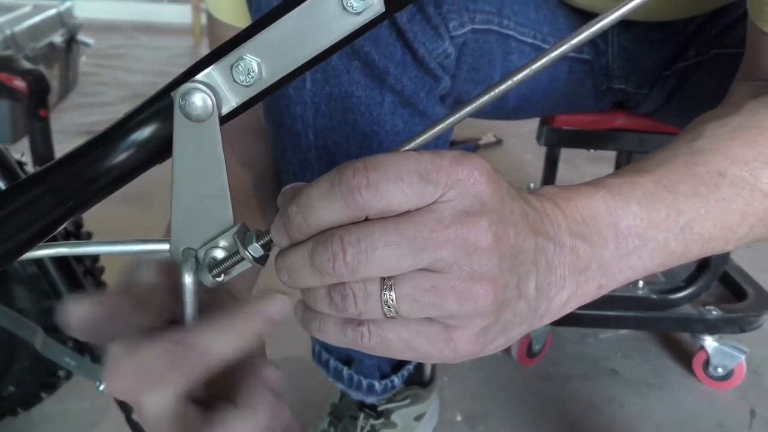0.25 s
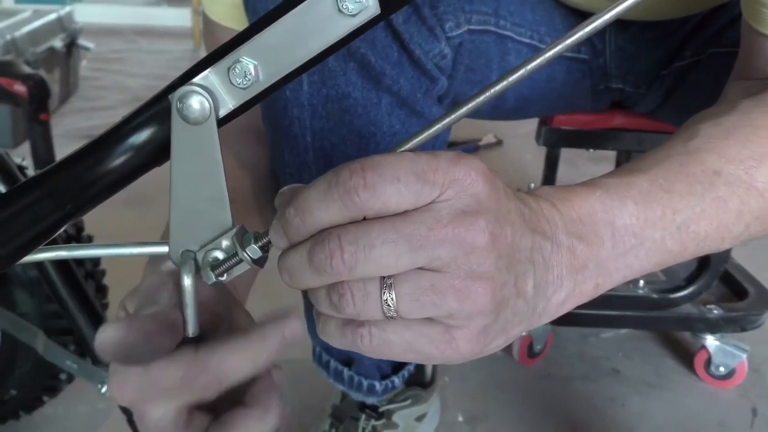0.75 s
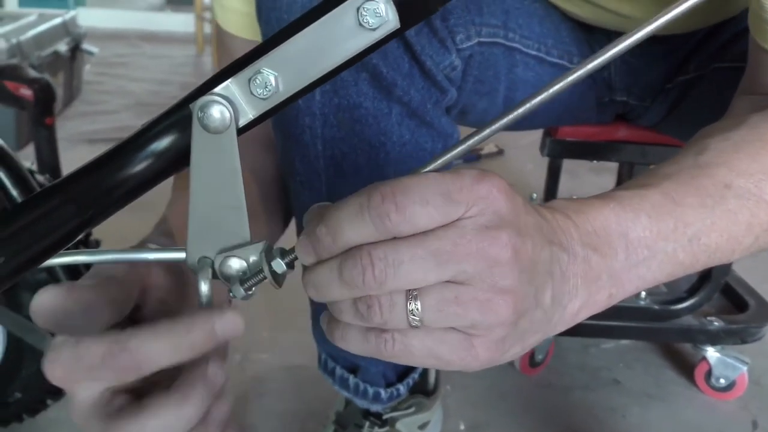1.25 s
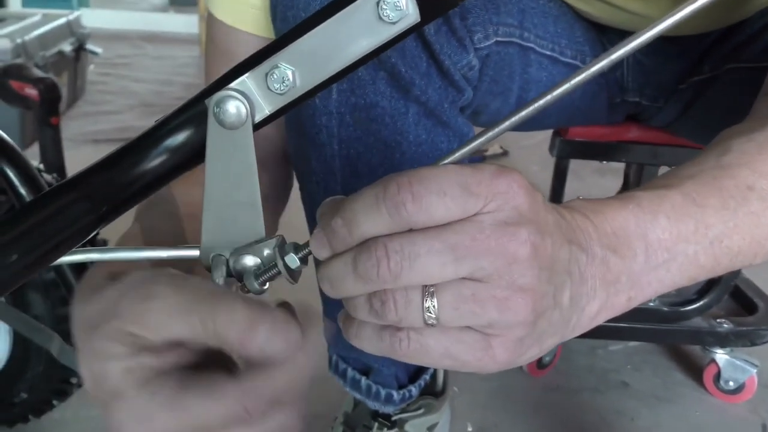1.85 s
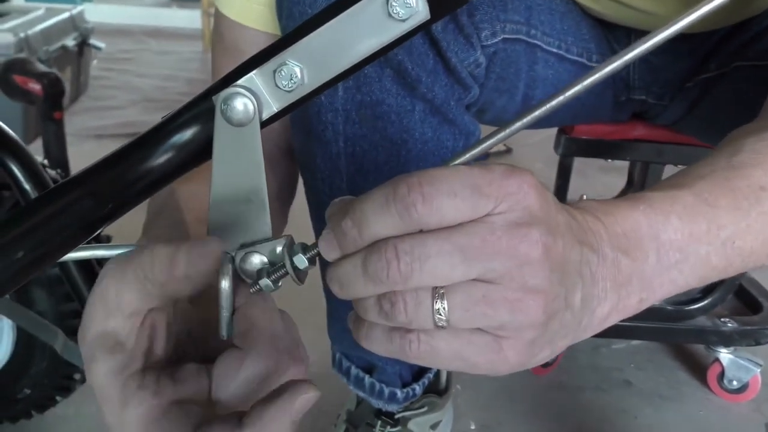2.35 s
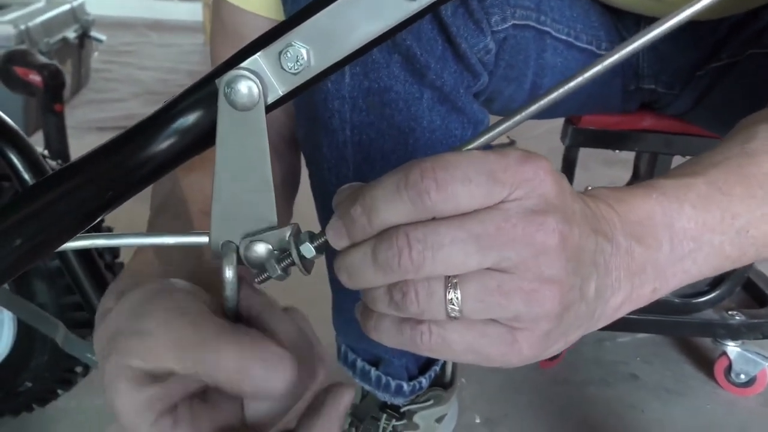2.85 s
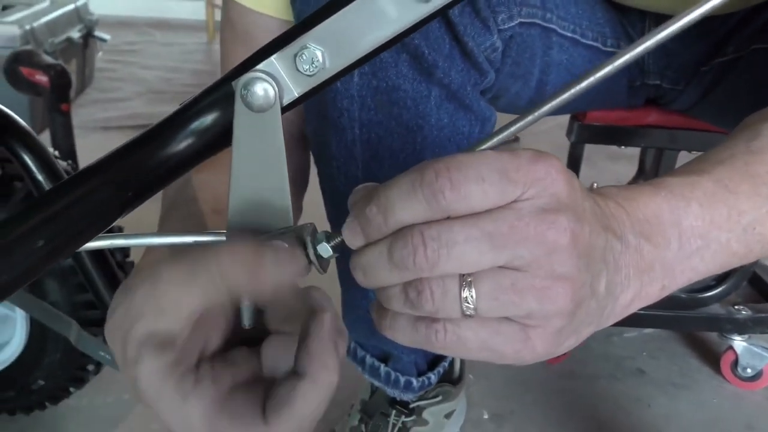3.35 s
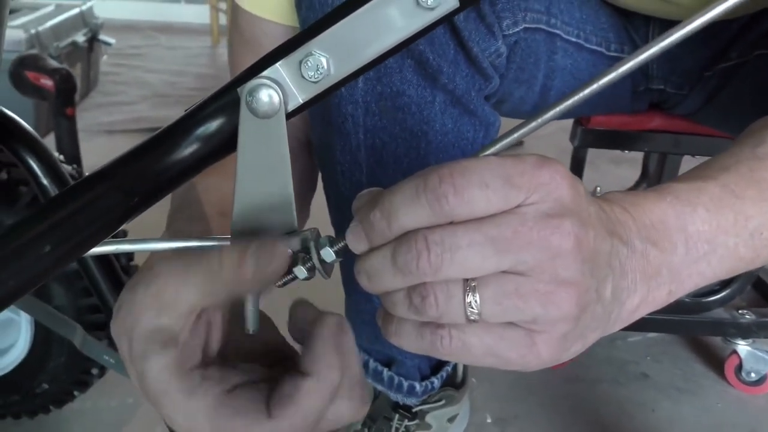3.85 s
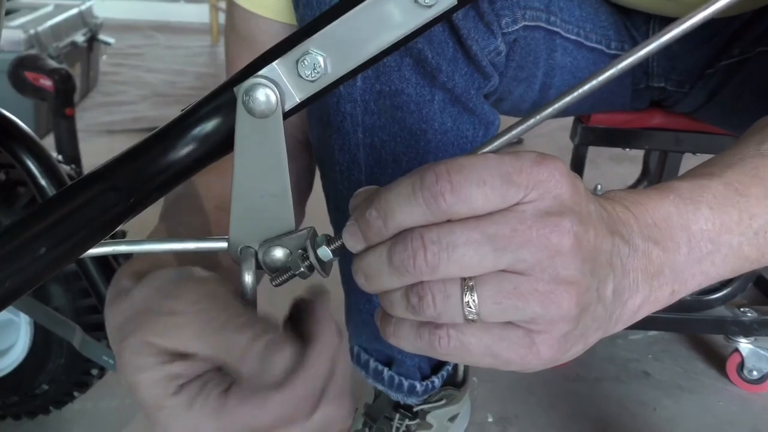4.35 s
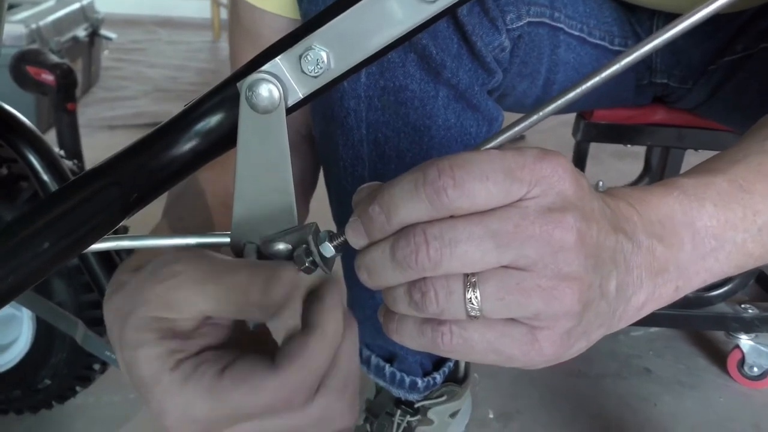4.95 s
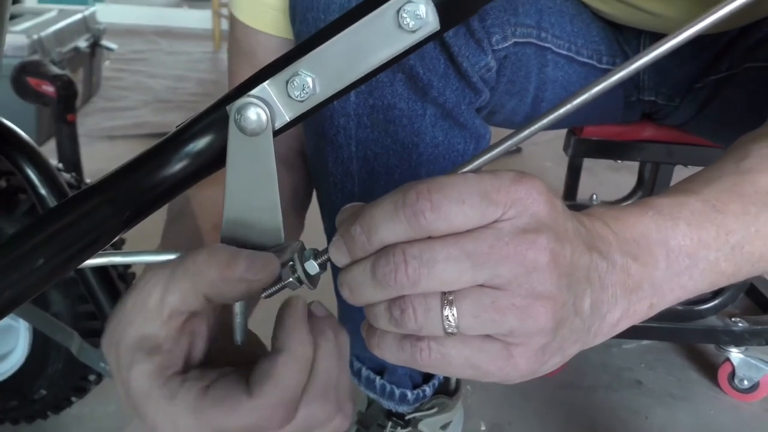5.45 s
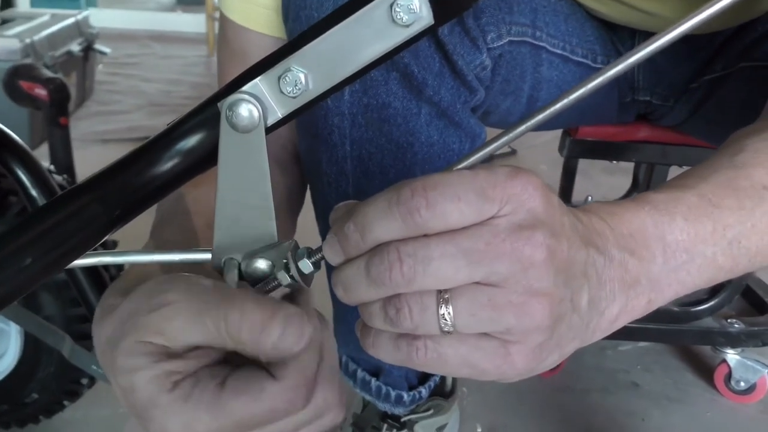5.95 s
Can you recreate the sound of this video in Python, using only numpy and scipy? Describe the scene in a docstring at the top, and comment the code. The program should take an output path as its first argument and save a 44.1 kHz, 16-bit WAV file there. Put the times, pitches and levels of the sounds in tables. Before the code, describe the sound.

Uneven bursts of light metallic clicking come from a nut being spun by hand on a loose steel linkage. Thread scrapes, small rattles and dull frame thuds mark each stroke, and fingertips hiss softly as they slip off. After a brief quieter gap around one and a half seconds, the strokes continue more gently, with hand bumps and faint squeaks. Close microphone, short room ring, quiet low rumble.

```python
"""In a small workshop, close to the microphone, a finger flicks a nut along the threaded rod of a steel linkage.
Each of the three to four strokes a second begins with rattle and thread scrape under a hiss of skin; the loose
joint clicks and knocks, and the fingertip hisses off the nut just after. Filtered noise bursts shake the steel.
From about two seconds on, a few short squeaks, made as gliding sines, join in; the hand lands between strokes.
Behind the blows the rod and room ring on, and a low hum and rumble swell as each push rocks the frame."""
import sys
import numpy as np
from scipy import signal
from scipy.fft import rfft, irfft, next_fast_len
from scipy.io import wavfile

SR = 44100
rng = np.random.default_rng(int(sys.argv[2]) if len(sys.argv) > 2 else 0)


def inscribe(sig):
    """Save sig as 16-bit PCM at rate SR to the path in sys.argv[1].

    A 1-D sig is mono; a 2-D sig holds one channel per row.
    Samples are clipped to [-1, 1] before scaling.
    """
    pcm = np.round(np.clip(np.atleast_2d(sig).T, -1, 1) * 32767)
    wavfile.write(sys.argv[1], SR, pcm.astype(np.int16))


N = 272792

# Distinct knocks of the loose joint: start_s, strength_db,
# clack_db (rod, relative to strength), tick_db (nut, relative to strength)
JOINT_KNOCKS = [(0.001, -39.5, 0, -12), (0.1746, -41, 2.5, -5), (0.218, -38.5, 0.5, -8),
                (0.3906, -50.5, 4, -8), (0.395, -43.5, -6, -20), (0.405, -37.5, 3.5, 12),
                (0.417, -36.5, 2, 25.5), (0.423, -28.5, 1, 10.5), (0.6237, -42.5, 8, 10),
                (0.6388, -31.5, 1, 7), (0.647, -31.5, 5, 18.5), (0.657, -31, 4, 16), (0.672, -37, 4.5, 5),
                (0.8565, -44, -2, 4), (0.8611, -42.5, 1.5, 5.5), (0.8901, -32.5, -2.5, -30),
                (0.9068, -36, 6, 8), (1.021, -51, 14, -6), (1.093, -42, 0, -5), (1.1564, -37, -5.5, -8),
                (1.1714, -40.5, -15, -10), (1.1863, -31, -13.5, -24), (1.201, -34, 1.5, -28),
                (1.5254, -39, 2, 0), (1.8185, -43, -8, -6), (1.851, -52.5, 7, -5),
                (1.8598, -38.5, 1, -11.5), (2.0032, -44.5, -5.5, -29.5), (2.0647, -44, -0.5, -2.5),
                (2.1357, -47.5, 2.5, -7), (2.1549, -39, -10, -9.5), (2.209, -55.5, 5, -22),
                (2.3864, -48.5, 1.5, 8), (2.447, -43.5, 2, -16), (2.657, -50, -14, -26),
                (2.709, -38, -17, -33), (2.726, -44, 3, 4), (2.7465, -32, 2, -2), (2.972, -48, -8, -29),
                (3.0058, -40, -5, -20), (3.0302, -41, -3, -12), (3.0481, -37, 0, 5.5), (3.056, -40, 6, 1),
                (3.295, -48.5, -15, -15), (3.3115, -44.5, -14.5, -14), (3.3405, -35, 1, 3.5),
                (3.347, -41, 1, 7.5), (3.359, -47, 7, 5), (3.598, -52, -19, -32), (3.6411, -44, -13.5, -12),
                (3.6508, -46.5, 1.5, -15), (3.854, -52, -2.5, -4), (3.896, -46, -10.5, -26),
                (3.9442, -48.5, -3.5, 0.5), (4.1696, -42, -3, -12.5), (4.2386, -36.5, -1, -13),
                (4.4742, -53, -1.5, -34), (4.5254, -34, 0.5, 1), (4.76, -50.5, -1, 8.5),
                (4.783, -39.5, -36.5, -34), (4.838, -44, -19, -22.5), (4.9108, -48, -3, -21.5),
                (5.0672, -54, -3.5, -20), (5.093, -48.5, -23, -28), (5.133, -30.5, -2, 4.5),
                (5.398, -50.5, -11.5, -16), (5.4624, -47, -2, -2.5), (5.4875, -45, 1, 6),
                (5.6746, -48.5, 12, -23), (5.736, -48.5, -1, 2.5), (5.7908, -48.5, 4.5, 1),
                (5.8461, -41.5, -5, 2), (5.9908, -52, 7, -27.5), (6.0619, -39, 1.5, 11)]
REBOUND_S, REBOUND_DB = .0055, -11  # mean delay of the one bounce, and its level relative to the knock


def joint_contacts(modes):
    """The joint takes up its play with a knock and one weaker rebound."""
    out = np.zeros(N)
    for start_s, strength_db, clack_db, tick_db in JOINT_KNOCKS:
        knock = from_db(strength_db) * contact(modes, clack_db, tick_db, *grip_hz(start_s))
        add(out, start_s, knock)
        rebound_s = REBOUND_S * rng.uniform(.7, 1.3)
        add(out, start_s + rebound_s, from_db(REBOUND_DB) * knock)
    return out


# Parts a contact shakes, heavy to light (frame, knock, rod, nut):
# half_band_octaves, rise_s, fade_s, gain_db
SHAKEN_PARTS = [(1.1, 0.0099, 0.02, 0), (0.78, 0.0015, 0.01, 1.5), (0.64, 0.0024, 0.0067, -0.5),
                (0.86, 0.0000994, 0.0018, -4.5)]
CLACK_HZ = 2806
KNOCK_HZ, KNOCK_OCTAVES_PER_DB = 869, .011  # a sharper tick goes with a higher knock
THUD_DB, THUD_PER_CLACK = -9.5, -0.296  # a soft contact passes more of its strength into the frame


def contact(modes, clack_db, tick_db, thud_hz, tick_hz, spot_spread=0.35):
    """Light parts answer at once, heavy ones swell and fade slowly; each spot met favours other modes."""
    mode_strengths = np.clip(1 + spot_spread * rng.standard_normal(len(modes)), 0, 1.25)
    steel = linkage_response(modes, mode_strengths)
    knock_hz = KNOCK_HZ * 2 ** (KNOCK_OCTAVES_PER_DB * tick_db)
    thud_db = THUD_DB + THUD_PER_CLACK * clack_db
    blows = [(thud_hz, thud_db), (knock_hz, 0), (CLACK_HZ, clack_db), (tick_hz, tick_db)]
    return sum(from_db(db + gain_db) * strike(steel, hz, octaves, rise_s, fade_s)
               for (hz, db), (octaves, rise_s, fade_s, gain_db) in zip(blows, SHAKEN_PARTS))


def strike(steel, hz, octaves, rise_s, fade_s, grain_db=2.5, ring_s=0.0019):
    """A tiny burst of chatter shakes one part; power 1 over the time it rings."""
    t = np.arange(SR // 10) / SR
    noise, grain = rng.standard_normal((2, len(t)))
    swell = (1 - np.exp(-t / rise_s)) * np.exp(-t / fade_s)
    chatter = noise * from_db(grain_db * grain) * swell
    ring = band(signal.fftconvolve(chatter, steel), hz / 2 ** octaves, hz * 2 ** octaves)
    return ring * np.sqrt(SR * (fade_s + ring_s) / np.sum(ring ** 2))


# The shifting grip tunes frame and nut: time_s, thud_hz, tick_hz
GRIP_PITCHES = [(.4, 185, 11000), (1.2, 175, 9930), (3.349, 205, 9200), (5.14, 138, 7170),
                (6.06, 160, 12000)]


def grip_hz(s):
    """The grip sets the pitch of the frame's thud and of the nut's tick at each moment."""
    times, thud_hz, tick_hz = np.transpose(GRIP_PITCHES)
    return np.interp(s, times, thud_hz), np.interp(s, times, tick_hz)


# Strokes of the finger: middle_s, half_length_s (the bell is down to a fifth there),
# and before each sound's own trim: scrape_db (thread), skin_db, slide_off_db (skin), thud_db (frame)
FINGER_STROKES = [(0.222, 0.036, -38, -71, -88, -48.5), (0.436, 0.028, -39.5, -68, -78, -37.5),
                  (0.675, 0.045, -35.5, -61, -75, -31.5), (0.91, 0.033, -35.5, -56, -70, -34.5),
                  (1.191, 0.046, -31.5, -71, -80, -38), (1.425, 0.051, -59, -70.5, -74, -72),
                  (1.51, .036, -55.5, -63, -71, -66), (1.85, 0.061, -40.5, -63.5, -84, -42),
                  (2.164, 0.074, -42.5, -66.5, -82, -43), (2.45, 0.048, -40.5, -69, -61.5, -48),
                  (2.745, 0.045, -37, -58, -74, -35), (3.04, 0.051, -35.5, -63, -61, -38.5),
                  (3.337, 0.043, -38, -58, -74, -39), (3.662, .055, -41, -62, -63, -60),
                  (3.932, .028, -57.5, -60, -56, -61), (4.245, 0.052, -46, -62, -60.5, -57.5),
                  (4.555, 0.041, -47, -58.5, -66.5, -55), (4.837, 0.053, -41.5, -63, -58.5, -38),
                  (5.14, 0.048, -45, -60, -63, -42.5), (5.472, 0.069, -51, -69.5, -60, -45.5),
                  (5.819, 0.03, -43, -68.5, -57.5, -45), (6.136, 0.051, -45, -65, -63, -58)]
# Relative spectrum of the thread's scrape: pitch_hz, level_db (per Hz)
SCRAPE_SPECTRUM = [(90, -22), (160, 0.5), (350, -2), (600, 7), (1100, -3), (1600, -2.5), (3000, -13),
                   (6000, -26), (12000, -40.5)]
# Relative spectrum of the skin's hiss: pitch_hz, level_db (per Hz)
SKIN_SPECTRUM = [(1500, -6), (4000, 4.5), (7000, -1), (9500, 9.5), (11000, -3.5), (13000, 4.5),
                 (16000, -4.5)]
# The fingertip leaves the nut this long after the middle of a stroke
SLIDE_OFF_S, SLIDE_OFF_HALF_LENGTH_S = .055, .024


def swipes(steel, scrape_db=-5.5, skin_db=0.0, slips_per_s=900, slip_db=3.5, judder_db=2.0, patchy_db=1.8):
    """The thread slips in many small catches that shake the steel; skin hisses over the nut's flats."""
    s, half_length, thread_db, hiss_db, off_db, _ = np.transpose(FINGER_STROKES)
    pressure = bells(s, half_length, thread_db)
    slide_off = bells(s + SLIDE_OFF_S, np.full(len(s), SLIDE_OFF_HALF_LENGTH_S), off_db)
    speed = bells(s, half_length, hiss_db) + slide_off
    catches = (rng.random(N) < slips_per_s / SR) * rng.choice([-1, 1], N)
    slips = catches * from_db(slip_db * rng.standard_normal(N))
    shaken_steel = signal.fftconvolve(slips, steel)[:N]
    scrape = coloured(shaken_steel, SCRAPE_SPECTRUM) * pressure * from_db(scrape_db)
    hiss = coloured(rng.standard_normal(N), SKIN_SPECTRUM) * speed
    unsteady = from_db(skin_db + judder_db * drift(700) + patchy_db * drift(70))
    return scrape + hiss * unsteady


def bells(middles, half_lengths, levels_db):
    """The finger's effort swells and eases in a bell on each stroke."""
    t, out = np.arange(N) / SR, np.zeros(N)
    for s, half_length, db in zip(middles, half_lengths, levels_db):
        near = slice(max(int((s - 2 * half_length) * SR), 0), int((s + 2 * half_length) * SR))
        out[near] += from_db(db) * np.exp(-1.6 * ((t[near] - s) / half_length) ** 2)
    return out


# Small contacts of the spinning nut: mean rate, level added to each stroke's scrape_db
RATTLE_PER_S, RATTLE_DB = 75, -11.5
RATTLE_CLACK_DB, RATTLE_TICK_DB = -1, -8  # relative to the strength of each touch
# The rattle comes a little earlier than the scrape and lasts this many times longer
RATTLE_LEAD_S, RATTLE_WIDTH = .006, 1.1


def rattle(modes, spread_db=7.0, unevenness=.6, count=5):
    """The driven nut wobbles on the thread, touching one of a few spots at uneven intervals."""
    s, half_length, thread_db = np.transpose(FINGER_STROKES)[:3]
    drive = bells(s - RATTLE_LEAD_S, half_length * RATTLE_WIDTH, thread_db + RATTLE_DB)
    timing, size, place = rng.random((1000, 3)).T
    times = (np.arange(len(timing)) + unevenness * (2 * timing - 1) + 1) / RATTLE_PER_S
    at = (times * SR).astype(int)
    sizes = from_db(spread_db * (2 * size - 1))
    spots = (place * count).astype(int)
    out = np.zeros(N)
    # each spot takes its pitches from the grip at another moment
    for spot, moment in enumerate(np.linspace(0, N / SR, count)):
        met = (spots == spot) & (at < N)
        touches = np.zeros(N)
        touches[at[met]] = sizes[met]
        touch_sound = contact(modes, RATTLE_CLACK_DB, RATTLE_TICK_DB, *grip_hz(moment))
        out += signal.oaconvolve(touches * drive, touch_sound)[:N]
    return out


# Short squeaks of thread and fingertip: start_s, length_s, start_hz, end_hz
# (the pitch wavers about this glide), level_db (at the middle of the squeak)
SQUEAK_GLIDES = [(2.156, 0.02, 800, 750, -37), (2.317, 0.032, 2950, 3370, -67),
                 (2.581, 0.053, 2750, 3660, -65.5), (2.676, 0.053, 5630, 4500, -67),
                 (2.707, 0.023, 780, 730, -41), (3.941, 0.013, 1116, 1070, -36.5),
                 (5.987, .02, 3440, 3000, -64)]


def squeaks(jitter=0.033):
    """The thread sticks and slips so fast that it sings a short, unsteady glide."""
    out, waver = np.zeros(N), 1 + jitter * drift(430)
    for start_s, length_s, start_hz, end_hz, level_db in SQUEAK_GLIDES:
        n, at = int(length_s * SR), int(start_s * SR)
        hz = np.linspace(start_hz, end_hz, n) * waver[at:at + n]
        tone = np.sqrt(2) * np.sin(2 * np.pi * np.cumsum(hz) / SR)
        add(out, start_s, from_db(level_db) * np.hanning(n) * tone)
    return out


# Soft landings of the hand on the linkage between strokes: start_s, thump_db (before the trim in thuds)
HAND_NUDGES = [(0.0, -46), (1.38, -58), (1.648, -52), (2.003, -47.5), (2.32, -45.5), (2.343, -57),
               (3.558, -56.5), (3.854, -47.5), (4.172, -50), (4.433, -50.5), (5.014, -52.5), (5.328, -54),
               (5.672, -45.5)]
NUDGE_HZ = 140
SCUFF_HZ, SCUFF_DB = 650, -5  # the palm also scuffs the lever; level relative to thump_db


def thuds(steel, octaves=0.66, rise_s=0.017, fade_s=.024, lead_s=.004, gain_db=-2.5,
          nudge_octaves=1.0, nudge_rise_s=0.0031, nudge_fade_s=0.021):
    """The heavy frame answers each stroke, and each landing of the hand, with a dull thud."""
    out = np.zeros(N)
    for s, *_, thud_db in FINGER_STROKES:
        thud = strike(steel, grip_hz(s)[0], octaves, rise_s, fade_s)
        add(out, s - lead_s, from_db(thud_db + gain_db) * thud)
    for s, thump_db in HAND_NUDGES:
        for hz, part_db in ((NUDGE_HZ, gain_db), (SCUFF_HZ, SCUFF_DB)):
            thump = strike(steel, hz, nudge_octaves, nudge_rise_s, nudge_fade_s)
            add(out, s, from_db(thump_db + part_db) * thump)
    return out


# Resonances of the linkage, and one dead spot: pitch_hz, width_hz, level_db (at full strength)
LINKAGE_RESONANCES = [(138, 14, 10), (228, 35, 7), (480, 22, 8), (538, 18, 6), (700, 40, 8), (810, 60, 4),
                      (1100, 100, 7), (1350, 35, 5), (1530, 160, -9), (1830, 60, 5), (2030, 70, 4),
                      (2200, 80, 5), (2640, 120, 5), (2795, 50, 8), (3065, 40, 6), (3440, 30, 6),
                      (3560, 40, 7), (4100, 60, 7), (4585, 80, 10), (5280, 200, 6), (5405, 30, 11),
                      (6465, 80, 12), (7660, 70, 10), (8160, 70, 11), (8470, 70, 9), (9350, 150, 7),
                      (10670, 60, 9), (11000, 80, 10), (11310, 90, 9), (14600, 200, 7)]


def linkage_modes(size=8192):
    """Each resonance of the steel lifts (the dead spot dips) a narrow band; log frequency responses."""
    f = np.fft.rfftfreq(size, 1 / SR)
    return np.log([(hz ** 2 - f ** 2 + 1j * from_db(db) * width * f) / (hz ** 2 - f ** 2 + 1j * width * f)
                   for hz, width, db in LINKAGE_RESONANCES])


def linkage_response(modes, strengths):
    """An impact passes through every resonance, each at its own strength, and rings on in them."""
    log_response = np.sum(np.reshape(strengths, (-1, 1)) * modes, axis=0)
    response = irfft(np.exp(log_response))
    return response[:len(response) // 2]


def rod_ring(x, low_hz=3300, high_hz=3700, t60_s=.75, ring_db=-13.5):
    """The free length of the rod keeps a cluster of close modes singing after each blow."""
    t = np.arange(SR) / SR
    tail = band(rng.standard_normal(len(t)), low_hz, high_hz) * from_db(-60 * t / t60_s)
    tail *= np.sqrt(2 * (high_hz - low_hz) / SR / np.sum(tail ** 2))
    return from_db(ring_db) * signal.fftconvolve(x, tail)[:N]


# Time the workshop takes to fade by 60 dB: pitch_hz, fade_s
ROOM_FADES = [(100, 0.44), (500, 0.23), (1500, 0.43), (3500, 0.3), (7000, 0.16), (11000, 0.68),
              (16000, 0.19)]
# Strength of the workshop's reflections: pitch_hz, level_db
ROOM_LEVELS = [(80, -1), (200, -5), (600, -5), (1500, -13.5), (3500, -11), (6000, -12), (10000, -25),
               (16000, -31.5)]


def workshop(x, build_s=.012):
    """Reflections thicken over the first moments and die away band by band."""
    t = np.arange(SR * 3 // 4) / SR
    edges = np.geomspace(60, 17000, 15)
    tail = 0
    for low, high in zip(edges, edges[1:]):
        hz = np.sqrt(low * high)
        dying = band(rng.standard_normal(len(t)), low, high) * from_db(-60 * t / at_hz(ROOM_FADES, hz))
        dying *= 1 - np.exp(-(t / build_s) ** 2)
        level = from_db(at_hz(ROOM_LEVELS, hz)) * np.sqrt(2 * (high - low) / SR / np.sum(dying ** 2))
        tail = tail + level * dying
    return signal.fftconvolve(x, tail)[:N]


USUAL_THUD_DB = -47
NUDGE_SWAY_DB = 11  # a nudge rocks the frame more than a stroke of the same level


def rocking(lead_s, rise_s, fade_s, usual_db, follows):
    """Each stroke and nudge sets the frame moving, and the motion dies away."""
    t, power = np.arange(SR) / SR, np.zeros(N)
    swell = (1 - np.exp(-t / rise_s)) * np.exp(-t / fade_s)
    pushes = [(s, db) for s, *_, db in FINGER_STROKES]
    pushes += [(s, db + NUDGE_SWAY_DB) for s, db in HAND_NUDGES]
    for s, db in pushes:
        push_db = usual_db + follows * (db - USUAL_THUD_DB)
        add(power, s - lead_s, (from_db(push_db) * swell) ** 2)
    return np.sqrt(power)


# How the hum follows a push: lead_s (negative starts after it), rise_s, fade_s,
# usual_db (at a usual thud, before the swell), follows (share of the thud's swing in dB)
HUM_SWAY = (-0.19, 0.25, 0.07, -40, .6)
HUM_HZ, HUM_REST_DB = 43.1, -66  # the pitch wanders about this; level between strokes


def hum(wander=.6, waver_db=2.5):
    """A low tone with slightly drifting phase and level swells whenever the frame is rocked."""
    t = np.arange(N) / SR
    tone = np.sqrt(2) * np.sin(2 * np.pi * HUM_HZ * t + wander * drift(3.5))
    return tone * from_db(waver_db * drift(12)) * np.hypot(rocking(*HUM_SWAY), from_db(HUM_REST_DB))


# How the rumble follows a push: lead_s, rise_s, fade_s, usual_db, follows, as for the hum
RUMBLE_SHUDDER = (-0.1, 0.4, 0.01, -43, .7)
# Relative spectrum of the rumble: pitch_hz, level_db (per Hz)
RUMBLE_SPECTRUM = [(18, -17.5), (30, -4), (45, -3), (62, -2), (80, -1), (100, -3), (130, -16), (300, -61.5)]
RUMBLE_REST_DB = -64  # between strokes


def rumble():
    """Soft low noise swells with the rocking frame."""
    noise = coloured(rng.standard_normal(N), RUMBLE_SPECTRUM)
    return noise * np.hypot(rocking(*RUMBLE_SHUDDER), from_db(RUMBLE_REST_DB))


# How the boom follows a push: lead_s, rise_s, fade_s, usual_db, follows, as for the hum
BOOM_SWAY = (0.03, 0.3, 0.0261, -45, 0.7734)
BOOM_HZ, BOOM_WIDTH_HZ = 98, 22


def boom():
    """A higher mode of the frame, a narrow band of noise, is woken most by the heavier thuds."""
    low_hz, high_hz = BOOM_HZ - BOOM_WIDTH_HZ / 2, BOOM_HZ + BOOM_WIDTH_HZ / 2
    return rms_one(band(rng.standard_normal(N), low_hz, high_hz)) * rocking(*BOOM_SWAY)


# Relative spectrum of the still air: pitch_hz, level_db (per Hz)
AIR_SPECTRUM = [(20, -8.5), (43, -12), (80, -14), (100, -1), (170, -5.5), (400, -10.5), (750, -13),
                (1300, -24), (1700, -23.5), (3100, -26.5), (3550, -23), (4000, -28), (6500, -33),
                (16000, -39.5)]
AIR_DB = -61


def still_air():
    """The air of the workshop is steady noise, strongest in the bass."""
    return from_db(AIR_DB) * coloured(rng.standard_normal(N), AIR_SPECTRUM)


def from_db(db):
    """Decibels to gain."""
    return 10 ** (np.asarray(db) / 20)


def rms_one(x):
    """Scale to rms 1."""
    return x / np.sqrt(np.mean(x ** 2) + 1e-20)


def at_hz(points, hz):
    """Read a table on a log-frequency axis."""
    f, value = np.transpose(points)
    return np.interp(np.log(np.maximum(hz, 1)), np.log(f), value)


def coloured(x, spectrum):
    """Give a steady signal a spectrum; rms 1."""
    size = next_fast_len(N)
    gain = from_db(at_hz(spectrum, np.fft.rfftfreq(size, 1 / SR)))
    return rms_one(irfft(rfft(x, size) * gain, size)[:N])


def drift(per_s):
    """Chance wandering through new values per_s times a second; rms 1."""
    knots = rng.standard_normal(int(N / SR * per_s) + 2)
    return rms_one(np.interp(np.arange(N) / SR * per_s, np.arange(len(knots)), knots))


def band(x, low_hz, high_hz):
    """Causal band-pass."""
    edges = [low_hz, min(high_hz, .45 * SR)]
    return signal.sosfilt(signal.butter(2, edges, "band", fs=SR, output="sos"), x)


def add(out, s, sound):
    """Mix a sound in at a time."""
    at = max(round(s * SR), 0)
    out[at:at + len(sound)] += sound[:max(N - at, 0)]


def scene(rub_strength=0.82, evening_out=0.6, thud_strength=.65):
    """Clicks and rubbing close to the microphone, the room behind; the hand damps the steel as it thuds."""
    modes = linkage_modes()
    work = joint_contacts(modes)
    work += swipes(linkage_response(modes, rub_strength))
    work += rattle(modes)
    work += thuds(linkage_response(modes, thud_strength))
    work += squeaks()
    # the walls collect what is radiated in all directions, so the steel's peaks and dips even out
    radiated = signal.fftconvolve(work, linkage_response(modes, -evening_out))[:N]
    background = hum() + rumble() + boom() + still_air()
    return (work + rod_ring(work) + workshop(radiated) + background)[None]


def record(dry, cutoff_hz=16100):
    """The top is cut steeply."""
    return signal.sosfilt(signal.ellip(10, .2, 80, cutoff_hz, fs=SR, output="sos"), dry)


dry = scene()
out = record(dry)
inscribe(out)
```